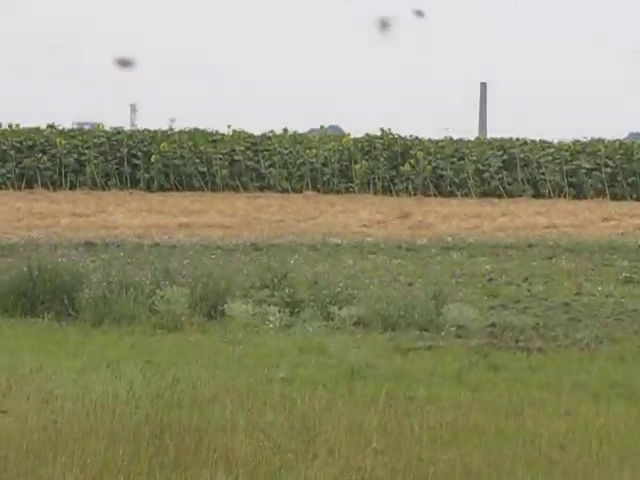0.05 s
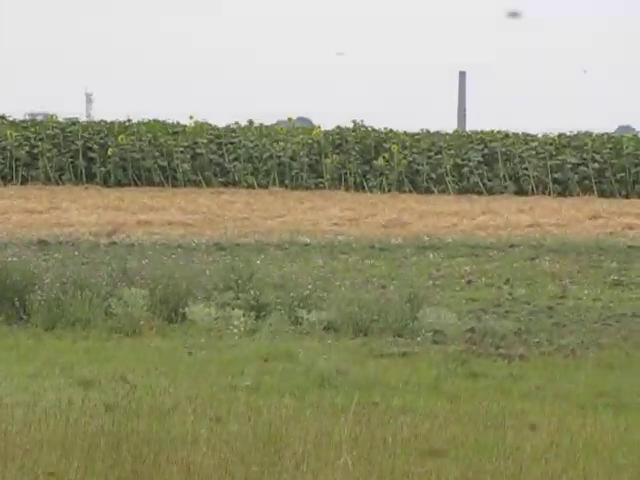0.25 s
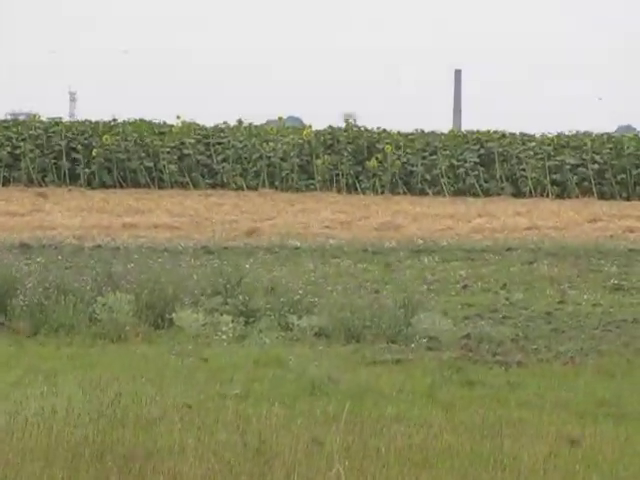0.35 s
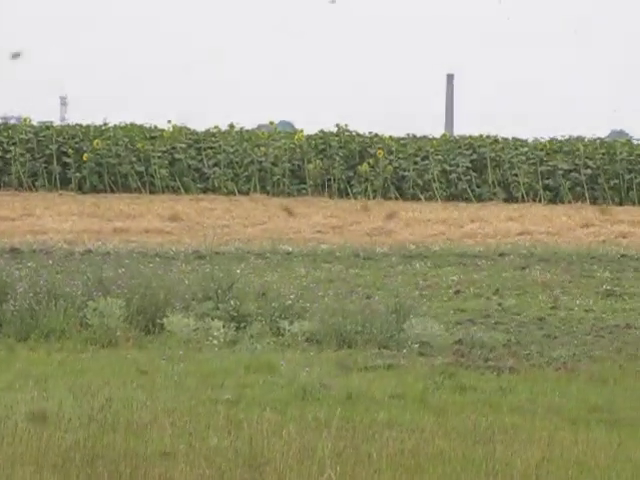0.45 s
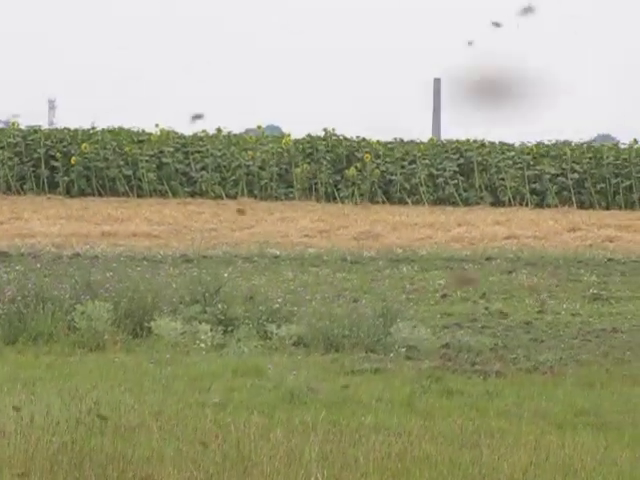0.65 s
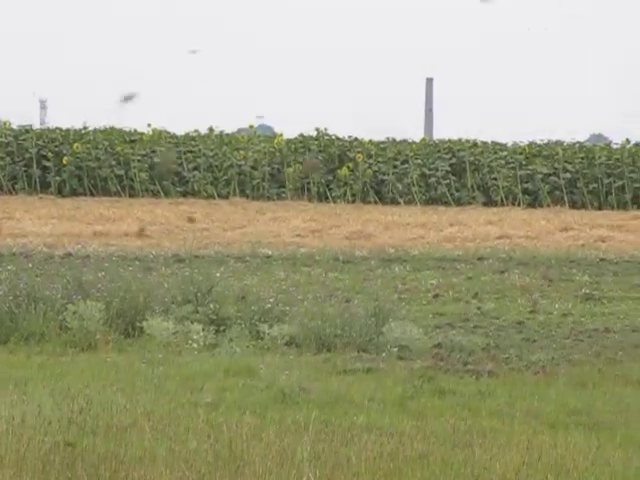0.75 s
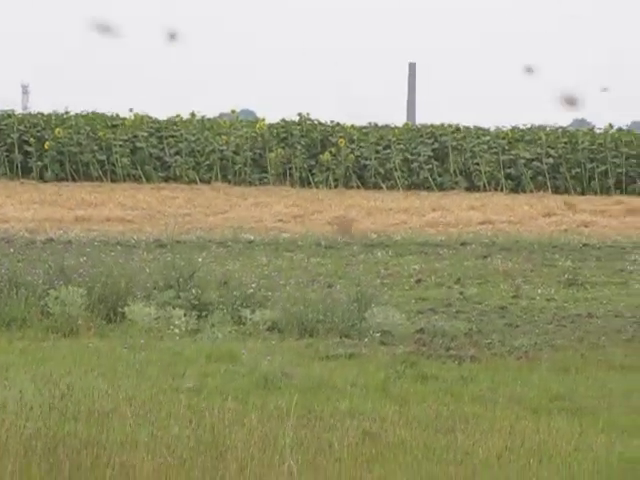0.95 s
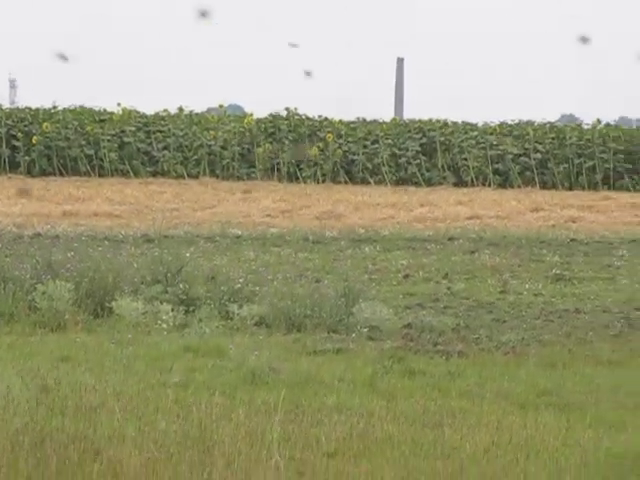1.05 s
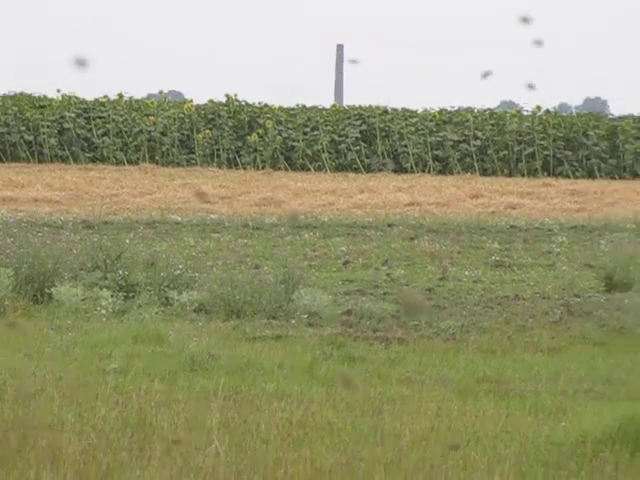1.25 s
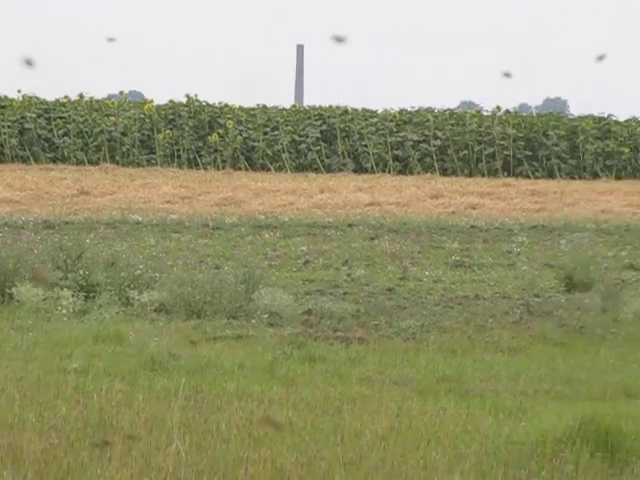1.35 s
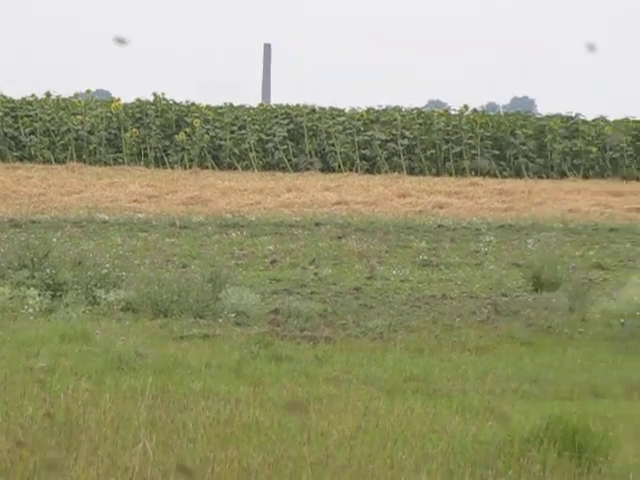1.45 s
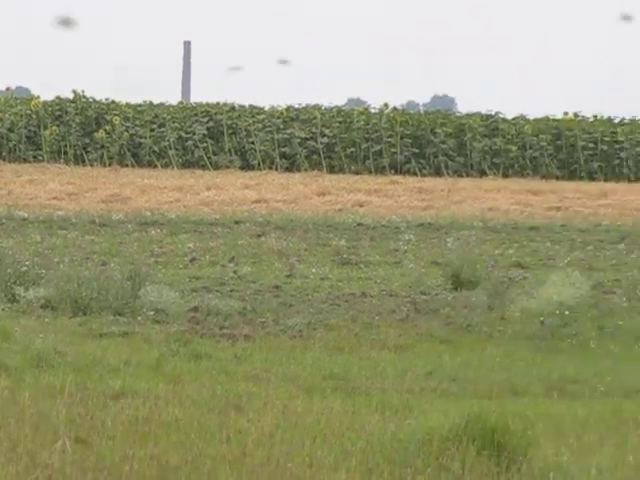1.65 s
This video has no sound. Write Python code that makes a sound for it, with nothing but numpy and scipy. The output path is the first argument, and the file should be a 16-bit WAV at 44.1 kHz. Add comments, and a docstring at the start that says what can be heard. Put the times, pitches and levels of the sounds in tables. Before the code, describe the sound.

Bees buzz in a light breeze as something small knocks sharply against the microphone.

```python
"""A swarm of bees hums over an open field: each wingbeat radiates a harmonic series, and the many
slightly different pitches merge into one drone. Single bees pass close, falling in pitch (Doppler shift).
Behind them a breeze hisses, wind brushes the microphone and a small bird trills far off.
Something small, probably a bee, knocks hard on the camera, bounces and taps twice more, ringing its
casing. The knock overloads the input, whose gain control ducks the field and slowly lets it back."""
import sys
import numpy as np
from scipy import signal
from scipy.fft import irfft
from scipy.io import wavfile
from scipy.ndimage import uniform_filter1d

SR = 44100
rng = np.random.default_rng(int(sys.argv[2]) if len(sys.argv) > 2 else 0)


def wav_out(sig):
    """Save sig, one row per channel (or a flat mono array), as 16-bit PCM at SR to the path in sys.argv[1]."""
    wavfile.write(sys.argv[1], SR, np.round(np.clip(np.atleast_2d(sig).T, -1, 1) * 32767).astype(np.int16))


N = 74970


def amp(db):
    """The decibel scale: 20 dB is a factor of ten in amplitude."""
    return 10 ** (np.asarray(db) / 20)


def unit(x):
    """Normalisation to an rms of 1."""
    return x / np.sqrt(np.mean(x ** 2) + 1e-20)


def spectrum_at(points, hz):
    """Interpolation of a spectrum on a logarithmic frequency axis."""
    f, value = np.transpose(points)
    return np.interp(np.log(hz + 1), np.log(f + 1), value)


def add(mix, start_s, sound):
    """Superposition: a stereo sound joins the mix at its start time."""
    part = mix[:, max(round(start_s * SR), 0):][:, :sound.shape[1]]
    part += sound[:, :part.shape[1]]


def pan(db):
    """Direction by level difference: two gains, the left db above the right."""
    return amp([[db / 2], [-db / 2]])


def drift(corner_hz):
    """Low-pass noise: smooth random motion of rms about 1."""
    f = np.fft.rfftfreq(2 * N, 1 / SR)[:2048]
    real, imag = rng.standard_normal((2, len(f)))
    return unit(irfft((real + 1j * imag) / (1 + (f / corner_hz) ** 2), 2 * N))[:N]


def bump(u):
    """A critically damped pulse: it rises to 1 at u = 1, then dies away."""
    return u * np.exp(1 - u)


def breeze(level_db=-46, patchy_db=0.5, swell_db=-0.5):
    """Turbulence in grass and crops: broadband hiss, only partly coherent between left and right."""
    # Each row: frequency in Hz, relative spectral density in dB.
    density = [(20, -1.5), (60, -11.5), (125, -7), (330, -0.5), (700, -1), (1200, -1.5), (2000, -3.5),
               (3500, -6), (5000, -8), (8000, -10), (11000, -15), (16000, -19.5)]
    # Each row: frequency in Hz, left-right correlation from 0 to 1.
    correlation = [(60, 0.7), (300, 1), (1300, 0.56), (3000, 0.19), (7000, 0.37), (15000, 0.3)]
    # Each row: frequency in Hz, left minus right level in dB.
    balance = [(60, 1), (700, -7.5), (1300, -3.5), (2400, -6), (4400, 3), (8000, 0.5), (15000, 2)]
    frames, hz = N // 256 + 5, np.fft.rfftfreq(1024, 1 / SR)
    a, b, c, d, patches = rng.standard_normal((5, frames, len(hz)))
    patches = unit(uniform_filter1d(uniform_filter1d(patches, size=10, axis=0), size=12, axis=1))
    swell = unit(uniform_filter1d(rng.standard_normal(frames), size=20))[:, None]
    shared, side_db = spectrum_at(correlation, hz), spectrum_at(balance, hz) / 2
    left = a + 1j * b
    right = shared * left + np.sqrt(1 - shared ** 2) * (c + 1j * d)
    spectra = np.array([left * amp(side_db), right * amp(-side_db)])
    spectra *= amp(spectrum_at(density, hz) + patchy_db * patches + swell_db * swell)
    hiss = signal.istft(spectra.transpose(0, 2, 1), nperseg=1024, noverlap=768)[1][:, :N]
    return amp(level_db) * unit(hiss)


def gust(peak_s=0.076, length_s=0.092, level_db=-62, cutoff_hz=44.8):
    """Pressure fluctuations of wind at the microphone: a brief low rumble."""
    lowpass = signal.butter(2, cutoff_hz, fs=SR, output="sos")
    rumble = unit(signal.sosfilt(lowpass, rng.standard_normal((2, N))))
    return amp(level_db) * rumble * np.exp(-(2 * (np.arange(N) / SR - peak_s) / length_s) ** 2)


def bird_note(length_s, start_hz, end_hz, db, pulse_hz=0, dip_hz=0, depth=0):
    """Frequency and amplitude modulation of a gliding tone: in a trill each pulse ends in a pitch dip."""
    waver_hz, flutter_db, fade_share, left_lag_s = 58.3, 1.5, 0.13, .00003
    t = np.arange(0, length_s, 1 / SR)
    progress, pulse_phase = t / length_s, 2 * np.pi * pulse_hz * t
    glide = start_hz + (end_hz - start_hz) * progress
    hz = glide - dip_hz * ((1 - np.sin(pulse_phase)) / 2) ** 2 + waver_hz * drift(65)[:len(t)]
    fade = np.clip(np.minimum(progress, 1 - progress) / fade_share, 0, 1)
    pulses = 1 - depth * (1 + np.cos(pulse_phase)) / 2
    level = amp(db + flutter_db * drift(150)[:len(t)]) * fade * pulses
    cycles = np.cumsum(hz) / SR - hz * np.array([[left_lag_s], [0]])
    return level * np.sin(2 * np.pi * cycles) * pan(db=-1.5)


def bird():
    """A distant song of modulated pure tones: pulsed trills and short gliding whistles."""
    # Each row: start and length in seconds, first and last pitch in Hz, level in dB,
    # pulses per second, pitch dip in Hz, pulse depth from 0 to 1.
    trills = [(0.026, 0.094, 3465, 3020, -49, 85, 303, .8), (0.603, 0.27, 4375, 4245, -45, 58, 477, 0.46),
              (0.764, 0.13, 4240, 4430, -47, 100, 324, 0.1), (0.784, .2, 3660, 2950, -48, 87, 200, 0.8),
              (1.033, 0.051, 3580, 3300, -44.5, 90, 150, 1), (1.061, .275, 3150, 3048, -42, 62, 401, 1)]
    # Each row: start and length in seconds, first and last pitch in Hz, level in dB.
    whistles = [(0, 0.041, 4050, 2580, -44.5), (0.189, 0.023, 3400, 3050, -50),
                (0.25, 0.067, 3350, 3200, -49.5), (0.347, 0.011, 3620, 3560, -41.5),
                (1.425, 0.01, 4300, 4700, -50), (1.438, 0.0338, 4120, 3580, -46),
                (1.486, 0.045, 3120, 3000, -45), (1.684, .014, 3750, 3880, -55)]
    out = np.zeros((2, N))
    for start_s, *shape in trills + whistles:
        add(out, start_s, bird_note(*shape))
    return out


def knocks(click_s=.0001, click_low_hz=1710, thump_s=0.00011, scrape_low_hz=680, scrape_rise_s=0.00075):
    """Impact excitation: each blow clicks and scrapes, with a low thump from the overloaded input;
    the modes of the casing and microphone cavity ring."""
    # Each row: start in seconds; gains of ring, click, thump and scrape in dB; scrape decay in seconds;
    # scrape upper edge in Hz; onset's left minus right level in dB; off-centre share from 0 to 1.
    blows = [(.2272, -33, -16, -34.5, -16, 0.0026, 4140, -18.5, 0.6),
             (0.2282, 0, 3.5, -11, -8.5, 0.0012, 4000, -13.5, 0.94),
             (0.2385, -4, 4, -27, -10, 0.0028, 3750, -9.5, 0.77),
             (0.3892, -19.5, -44, -44, -45, .003, 4000, -6, 0.1),
             (0.5268, -32, -40, -42, -22, 0.0059, 1860, -4, 0.02)]
    # Each row: frequency in Hz, relative level in dB, time to peak in seconds and, for a fully
    # off-centre blow, left lag in seconds and left minus right level in dB.
    modes = [(520, -19, 0.00083, 0.0076, -1), (717, -7.5, 0.0016, 0.0058, -4.5),
             (993, -2.5, 0.0014, 0.0024, -6), (1060, -22.5, 0.0047, 0.0097, 4),
             (1360, -19, 0.0019, 0.0047, 21), (2560, -17.5, 0.00054, 0.016, -6),
             (3710, -27.5, 0.0015, 0.005, -8), (6240, -21.5, .0004, 0, -17)]
    out, t = np.zeros((2, N)), np.arange(SR // 20) / SR
    click = signal.lfilter(*signal.butter(2, click_low_hz, "high", fs=SR), bump(t / click_s) ** 2)
    overload_thump = bump(t / thump_s)
    for start_s, ring_db, click_db, thump_db, scrape_db, decay_s, top_hz, side_db, off_centre in blows:
        for hz, db, peak_s, lag_s, lean_db in modes:
            age = np.maximum(t - np.array([[lag_s * off_centre], [0]]), 0)
            ring = bump(age / peak_s) ** 2 * np.sin(2 * np.pi * hz * age)
            add(out, start_s, amp(ring_db + db) * pan(lean_db * off_centre) * ring)
        band = signal.butter(1, [scrape_low_hz, top_hz], "band", fs=SR)
        grit = unit(signal.lfilter(*band, signal.lfilter(*band, rng.standard_normal((2, len(t))))))
        scrape = grit * (1 - np.exp(-t / scrape_rise_s)) * np.exp(-t / decay_s)
        onset = amp(click_db) * click + amp(thump_db) * overload_thump + amp(scrape_db) * scrape
        add(out, start_s, onset * pan(side_db))
    return out


def wings(hz, db_per_octave=0, jitter_share=0.01603):
    """A nearly periodic wing stroke radiates a harmonic series on the wingbeat frequency."""
    # Each row: frequency in Hz, relative level of a harmonic there in dB.
    buzz_spectrum = [(150, -1.5), (240, -5), (480, 3.5), (720, -4.5), (1200, -0.5), (1700, -7), (2600, -15),
                     (5000, -22), (8000, -31)]
    k, phase = np.arange(1, 33), np.arange(1024) / 1024
    harmonics = amp(spectrum_at(buzz_spectrum, k * hz.mean()) + db_per_octave * np.log2(k))
    stroke = harmonics @ np.cos(2 * np.pi * (k[:, None] * phase + rng.random((len(k), 1))))
    cycles = np.cumsum(hz * (1 + jitter_share * drift(40.1))) / SR
    return np.interp(cycles % 1, phase, stroke)


def passing_bees(doppler_share=.025):
    """The Doppler effect: single bees swell out of the swarm and drop in pitch as they go by."""
    # Each row: time of closest approach and length in seconds, wingbeat in Hz, peak level in dB.
    passes = [(0.115, 0.13, 232, -57), (.85, 0.208, 239.7, -50.5), (1.281, 0.25, 220.3, -51.5),
              (1.548, .1, 257.1, -48)]
    out = np.zeros(N)
    for closest_s, length_s, hz, db in passes:
        along = 2 * (np.arange(N) / SR - closest_s) / length_s
        buzz = unit(wings(hz * (1 - doppler_share * np.tanh(along)), db_per_octave=-1))
        out += amp(db) * buzz / (1 + along ** 2)
    return out * pan(db=1.0)


def swarm(bees=48, wingbeat_hz=238, near_db=2.5, swoop_db=3.5, width=0.13):
    """Incoherent summation: bees, each at its own pitch and place, waver and swell as they swoop."""
    # Each row: time in seconds, level of the swarm in dB.
    levels = [(0, -45), (.2, -42), (.45, -44.5), (.62, -45.5), (.85, -44), (1.05, -45), (1.25, -44.5),
              (1.7, -46)]
    spread, wander = .088, .045  # rms shares of the pitch: between bees, and over time
    out = np.zeros((2, N))
    for rank in np.linspace(-1, 1, bees):
        near, side = rng.uniform(-1, 1, 2)
        hz = wingbeat_hz * (1 + spread * np.sqrt(3) * rank) * (1 + wander * drift(5))
        buzz = wings(hz) * amp(near_db * near + swoop_db * np.tanh(drift(3)))
        out += buzz * (1 + width * side * np.array([[1], [-1]]))
    level_db = np.interp(np.arange(N) / SR, *np.transpose(levels))
    return unit(out) * amp(level_db) * pan(db=0.1)


def scene():
    """Superposition of the field's sounds and the knocks at the microphone."""
    return swarm() + passing_bees() + breeze() + gust() + bird() + knocks()


def record(dry):
    """Automatic gain control ducks on peaks and recovers slowly; clipping and a band limit follow."""
    threshold_db, duck_share, attack_s, recover_s = -11.5, 0.73, .012, 0.5
    ceiling, cutoff_hz = .95, 15950
    over_db = np.maximum(20 * np.log10(abs(dry).max(0) + 1e-9) - threshold_db, 0)
    release = np.exp(-np.arange(N) / SR / recover_s)
    held_db = np.maximum.accumulate(over_db / release) * release  # each peak decays from its own time
    pole = np.exp(-1 / (attack_s * SR))
    duck_db = duck_share * signal.lfilter([1 - pole], [1, -pole], held_db)
    clipped = np.clip(dry * amp(-duck_db), -ceiling, ceiling)
    lowpass = signal.firwin(511, cutoff_hz, window=("kaiser", 9), fs=SR)
    return signal.oaconvolve(clipped, lowpass[None], "same")


dry = scene()
out = record(dry)
wav_out(out)
```